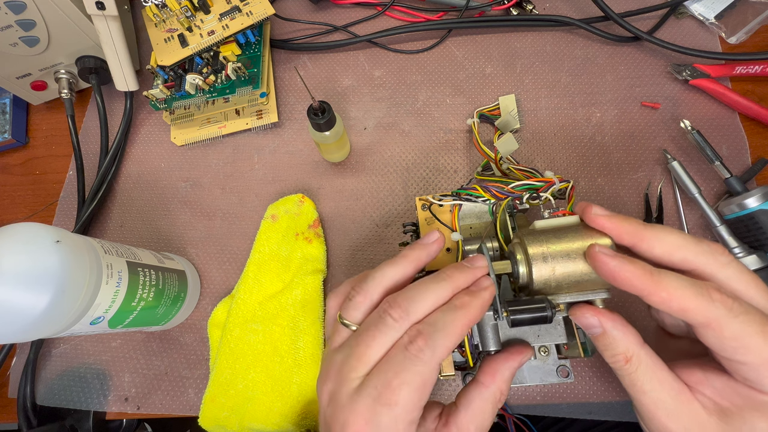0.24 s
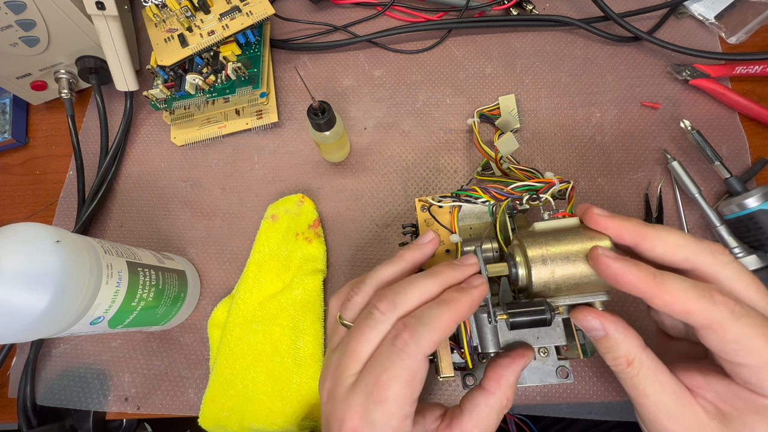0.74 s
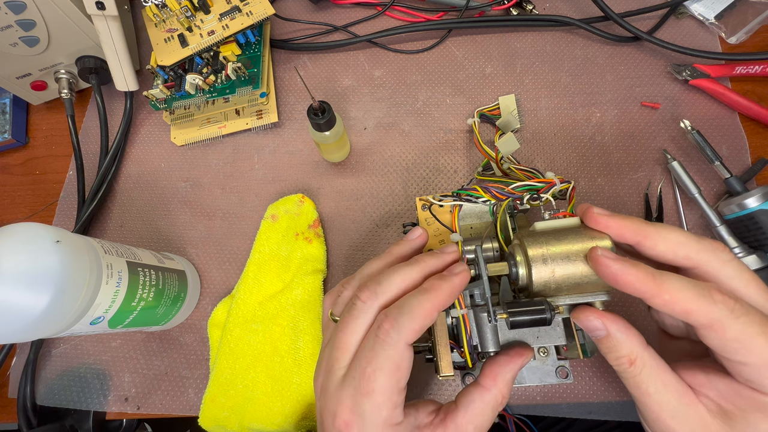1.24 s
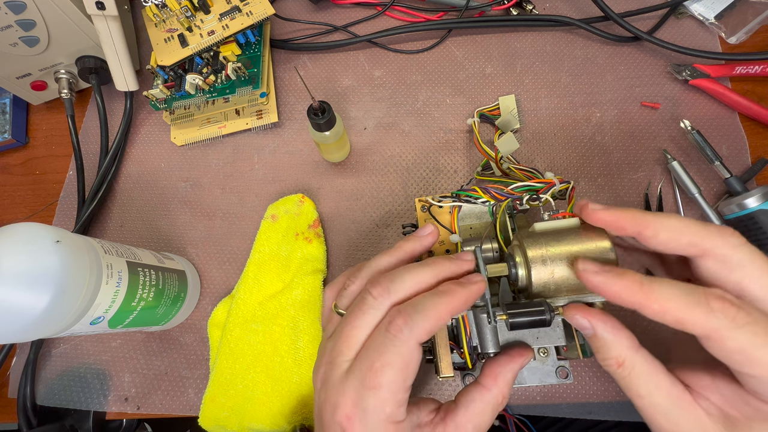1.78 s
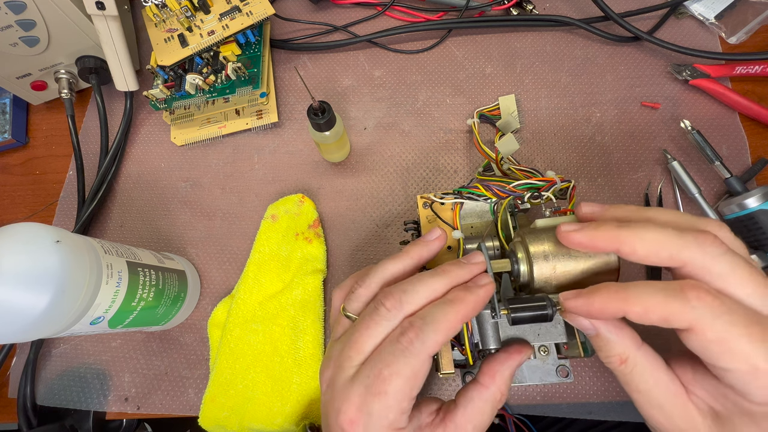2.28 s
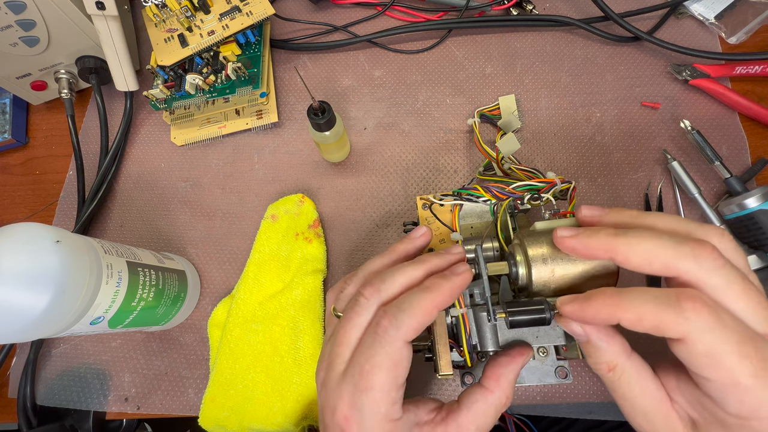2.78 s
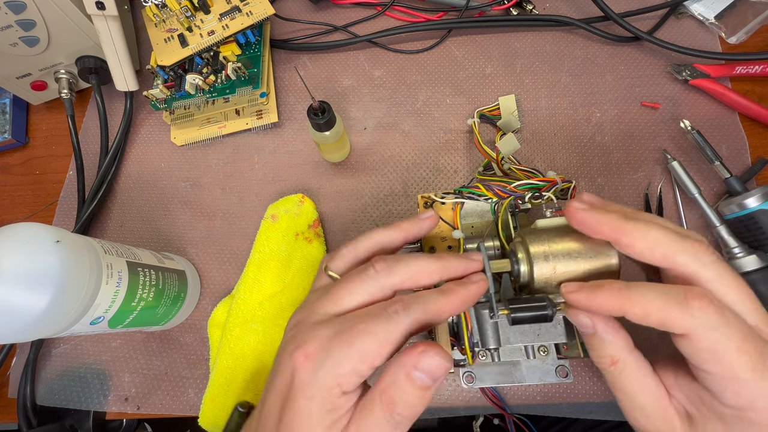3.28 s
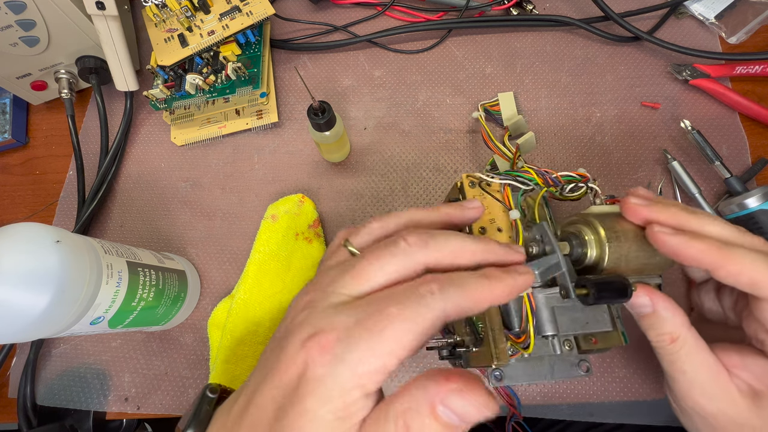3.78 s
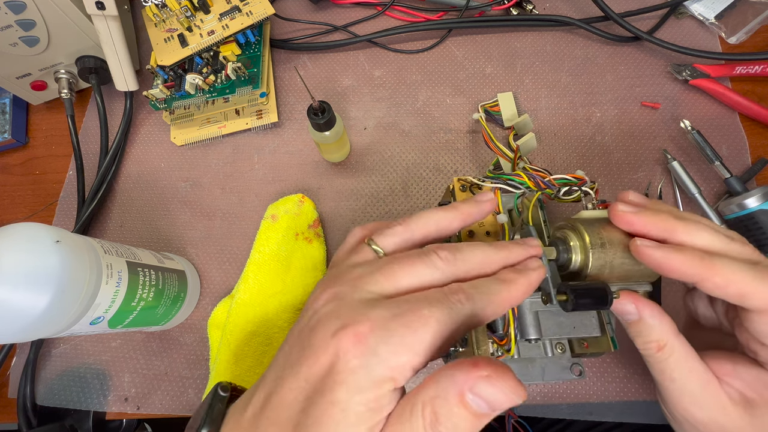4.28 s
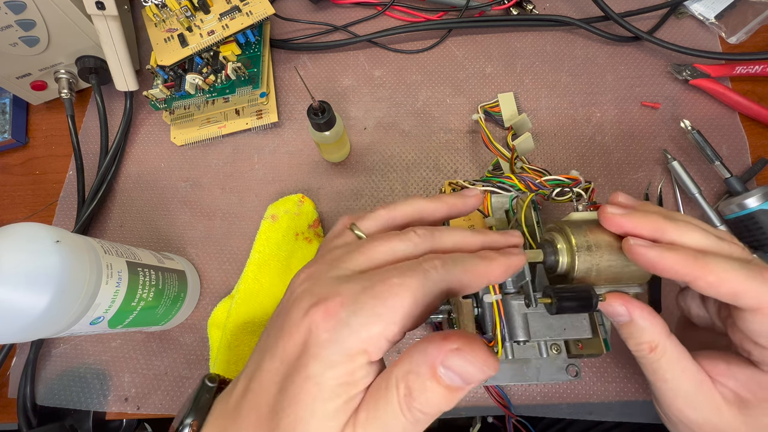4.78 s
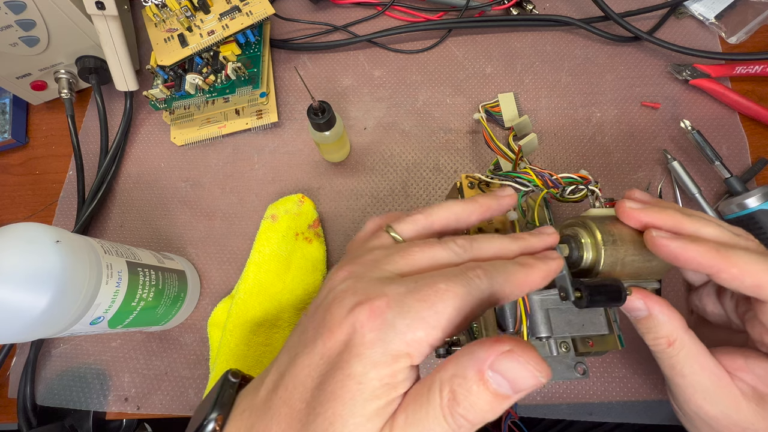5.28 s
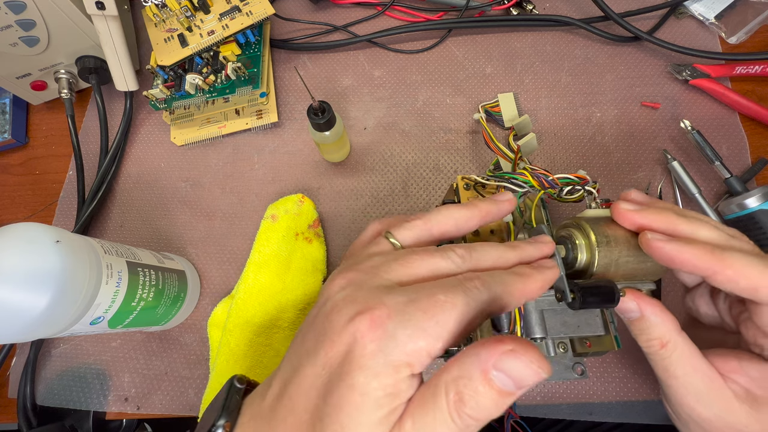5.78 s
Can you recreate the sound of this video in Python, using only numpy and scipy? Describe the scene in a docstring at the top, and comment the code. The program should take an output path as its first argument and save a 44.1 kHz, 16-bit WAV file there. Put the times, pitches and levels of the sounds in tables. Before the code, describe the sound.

Close, dry metallic clacks from a hand-worked solenoid, each led by a light tick and followed by a softer snap, over quiet equipment hum.

```python
"""A solenoid plunger is pushed in by hand and let back, clacking on its stop, heard close up in stereo.
Each clack is a burst of noise plus the ringing notes of the steel; the sleeve adds plinks and a grating slide.
The levers, spring and chassis tick in the same way, with softer noise and notes of their own.
Each action also thumps the workbench, made from low fading sines and a soft scuff.
Steady tones and coloured noise make the faint equipment hum and hiss; a short tail makes the small room."""
import sys
import numpy as np
from scipy import signal
from scipy.fft import rfft, irfft, next_fast_len
from scipy.io import wavfile
from scipy.ndimage import map_coordinates

SR = 44100
rng = np.random.default_rng(int(sys.argv[2]) if len(sys.argv) > 2 else 0)


def to_wav(sig):
    """Store sig (one row per channel, or 1-D mono) as 16-bit WAV at the path in sys.argv[1].

    Samples outside -1..1 are clipped; the rate is SR.
    """
    pcm = np.clip(np.atleast_2d(sig), -1, 1) * 32767
    pcm = np.round(pcm).astype(np.int16)
    wavfile.write(sys.argv[1], SR, pcm.T)  # frames by channels


N = 266364  # length in samples, about 6 s


def amp(db):
    """Turn decibels into a gain."""
    return 10 ** (np.asarray(db) / 20)


def unit(x):
    """Scale to an rms level of 1."""
    return x / np.sqrt(np.mean(x ** 2) + 1e-20)


def along(points, hz):
    """Read a curve given as (pitch_hz, value) points, with pitch on a log axis."""
    point_hz, value = np.transpose(points)
    return np.interp(np.log(hz + 1), np.log(point_hz + 1), value)


def wobble(rate):
    """A smooth random curve through `rate` random points a second."""
    points = rng.standard_normal(int(N * rate / SR) + 4)
    return map_coordinates(points, [np.arange(N) * rate / SR])


def coloured(x, gain_db):
    """Filter by a gain in dB at each frequency, with no sound ahead of the hit (minimum phase)."""
    n = x.shape[-1]
    m = 2 * next_fast_len(n // 2 + 2048)
    gain = amp(gain_db(np.fft.rfftfreq(m, 1 / SR)))
    cepstrum = irfft(np.log(gain + 1e-6), m)
    # folding the cepstrum onto positive times makes the filter minimum phase
    cepstrum[1:m // 2] *= 2
    cepstrum[m // 2 + 1:] = 0
    return irfft(rfft(x, m) * np.exp(rfft(cepstrum)), m)[..., :n]


def leaning(pair, side):
    """Tilt each frequency left or right; side is (pitch_hz, left_minus_right_db)."""
    n = pair.shape[1]
    m = next_fast_len(n + 2048)
    lean_db = along(side, np.fft.rfftfreq(m, 1 / SR)) / 2
    return irfft(rfft(pair, m) * amp([lean_db, -lean_db]), m)[:, :n]


def fade(t, t60):
    """Exponential decay that falls 60 dB in t60 seconds."""
    return np.exp(-np.log(1000) * t / t60)


def add(track, s, sound):
    """Mix a sound into the track at s seconds."""
    start = max(round(s * SR), 0)
    part = track[:, start:start + sound.shape[1]]
    part += sound[:, :part.shape[1]]


# How alike steady noise is on the left and right: pitch_hz, likeness (1 same, 0 unrelated, -1 opposite)
LIKENESS = [(60, 1), (130, -0.51), (290, 0.086), (640, -1.03), (1400, 0.094), (3100, -0.25), (7000, 0.39),
            (14000, 1)]


def rush(spectrum):
    """Steady stereo noise of rms 1, coloured by (pitch_hz, level_db) and shared by mid and side."""
    hz = np.fft.rfftfreq(N, 1 / SR)
    turn = np.arccos(np.clip(along(LIKENESS, hz), -1, 1)) / 2
    noise = rfft(rng.standard_normal((2, N))) * amp(along(spectrum, hz))
    mid, side = irfft(noise * [np.cos(turn), np.sin(turn)], N)
    return unit(np.array([mid + side, mid - side]))


HELD_T60 = 0.075  # s, longest ring the fingers allow


def contact(modes, colour, crack_t60, rattle_db, rattle_t60, ring_db, rough, rise):
    """Steel on steel: a crack, a darker rattle of loose parts, and the part's own ringing modes."""
    t = np.arange(SR // 4) / SR
    hz, db, t60 = np.transpose(modes)[:, :, None]
    t60 = np.minimum(t60, HELD_T60)
    # each microphone hears the modes in its own random phase
    phase = rng.uniform(0, 2 * np.pi, (2, len(modes)))
    strength = amp(rng.standard_normal(len(modes))) * np.exp(1j * phase)
    # parts that still touch make every mode wander in pitch
    steps = rng.standard_normal((len(modes), len(t)))
    wander = rough * np.sqrt(hz / SR) * np.cumsum(steps, axis=1)
    tones = amp(db) * fade(t, t60) * np.exp(1j * (2 * np.pi * hz * t + wander))
    ring = (strength @ tones).real

    rattle = coloured(rng.standard_normal((2, len(t))), lambda f: along([(6000, 2.5), (13000, -15.0)], f))
    burst = rng.standard_normal((2, len(t))) * fade(t, crack_t60)
    chatter = burst + amp(rattle_db) * rattle * fade(t, rattle_t60)
    crack = coloured(chatter, lambda f: along(colour, f))
    sound = (unit(crack) + amp(ring_db) * unit(ring)) * (1 - np.exp(-t / rise))
    return sound / np.sqrt(np.mean(sound[:, :SR // 200] ** 2))  # the first 5 ms get rms 1


# Landings on the stop: start_s, level_db, body_db, clank_db (near 3 kHz), left_minus_right_db (of the ring)
LANDINGS = [(0.188, -28, 0, -3, 15), (0.8364, -27, 0.5, -3.5, 18), (1.5433, -28.5, 1.5, -3.5, 13.5),
            (2.3485, -32.5, 0, 1, 5.5), (3.42, -30, -0.5, -1.5, 4), (4.364, -26.5, -2.5, -3, 2.5),
            (5.7748, -24.5, -4, -6, 4)]
# Hollow plinks of the plunger in its sleeve: start_s, level_db
SLEEVE_PLINKS = [(0.396, -49), (0.994, -52.5), (1.4416, -53.5), (3.5479, -50), (5.236, -55), (5.764, -31.5),
                 (5.9111, -49)]
# Notes of the solenoid frame and plunger: pitch_hz, level_db, fade_s (60 dB, before the fingers' limit)
STEEL_NOTES = [(394, -3.5, 0.22), (521.6, 4, 0.11), (599, 10, 0.093), (755, 11.5, 0.038), (1173, 10, 0.09),
               (1373, 7, 0.061), (1610, 12.5, 0.035), (1763, 12.5, 0.038), (2162, 7.5, 0.026),
               (3310, 2, 0.048), (3485, 0, 0.0614), (4200, -1.5, .06), (4470, -7.5, 0.096),
               (4878, 7.5, 0.034), (5133, 5.5, 0.032), (5500, -12.5, 0.021), (6620, 0, 0.038)]
# Notes of the sleeve: pitch_hz, level_db, fade_s (60 dB, before the fingers' limit)
SLEEVE_NOTES = [(1660, 2.5, 0.079), (1685, -7, 0.036), (1920, -42, 0.041)]
# Noise colour of a hard contact: pitch_hz, level_db
HARD_COLOUR = [(150, -16), (350, -2), (600, 5), (930, -1.5), (1600, 2), (2600, -4), (3300, -5.5),
               (4400, -7.5), (4900, -9), (6600, -6.5), (7600, -18), (9300, -18), (13000, -23),
               (16000, -39.5)]
# Colour shared by all landings, below the ring: pitch_hz, gain_db
LANDING_LOW_COLOUR = [(750, -6.5), (1100, -7.5), (2200, -2.5), (2800, 3), (3900, 3.5), (4500, 1)]
# Colour shared by all landings, from the ring up: pitch_hz, gain_db
LANDING_HIGH_COLOUR = [(7000, 0), (9000, 6.5)]


def plunger():
    """The plunger plinks in its sleeve and lands hard on its stop; the grip sets body and clank."""
    out = np.zeros((2, N))
    for s, db, body_db, clank_db, pan_db in LANDINGS:
        landing = contact(STEEL_NOTES, HARD_COLOUR, crack_t60=0.043, rattle_db=-5.5, rattle_t60=0.075,
                          ring_db=3, rough=0.28, rise=0.0008)
        grip = [(2200, body_db), (2800, clank_db), (3900, clank_db), (4500, 0.0098)]

        def tint(hz):
            return along(LANDING_LOW_COLOUR, hz) + along(LANDING_HIGH_COLOUR, hz) + along(grip, hz)

        side = [(400, -2.0), (2400, -3.0), (3400, 1.0), (4900, pan_db), (6500, 6.5), (15000, -4.0)]
        add(out, s, amp(db - 1.5) * leaning(coloured(landing, tint), side))
    for s, db in SLEEVE_PLINKS:
        plink = contact(SLEEVE_NOTES, HARD_COLOUR, crack_t60=0.0037, rattle_db=-15, rattle_t60=0.14,
                        ring_db=7, rough=0.64, rise=0.0003)
        add(out, s, amp(db - 5.5) * plink)
    return out


def sliding():
    """The plunger grates in its sleeve, louder as it gathers speed towards the stop."""
    t = np.arange(N) / SR
    speed = sum(np.exp(-np.abs(s - t) / 0.053) * (t < s) for s, *_ in LANDINGS)
    grit = rush([(500, 2), (1000, 15), (1650, 5.0), (2500, 2.0), (3400, -15.0), (4300, 1.0),
                 (9000, -10), (15000, -69)])
    return amp(-63.0 + 3.9 * wobble(150)) * speed * grit


def rebounding(events, after_s, loss_db):
    """Each contact and its softer rebound, as (start_s, level_db)."""
    hits = []
    for s, db, *_ in events:
        hits += [(s, db), (s + after_s, db + loss_db)]
    return hits


def strikes(events, make, level_db, body_db, edge_db):
    """A fresh contact for each (start_s, level_db) event, all with the same body and edge."""
    out = np.zeros((2, N))
    tint = [(2000, body_db), (2800, 0), (7000, 0), (9000, edge_db)]
    for s, db in events:
        add(out, s, amp(db + level_db) * coloured(make(), lambda hz: along(tint, hz)))
    return out


# A finger presses the lever and twangs its spring: start_s, level_db, bench_shove_db
LEVER_PRESSES = [(0.131, -43.5, -36), (0.7841, -48, -37), (1.491, -48.5, -39.5), (3.3522, -53, -42),
                 (4.321, -48, -34.5), (5.7327, -49, -37)]
# The finger lets go and the lever snaps back: start_s, level_db
LEVER_RELEASES = [(0.4073, -47), (1.0072, -49.5), (1.717, -48.5), (3.5709, -52), (4.5029, -48.5),
                  (5.2674, -49), (5.965, -50)]
# The levers knock in their pivots: start_s, level_db
PIVOT_KNOCKS = [(0.6267, -75), (1.779, -65.5), (1.867, -69.5), (2.2544, -70), (2.5572, -60.5),
                (2.5843, -62), (3.7567, -63.5), (4.1895, -63.5), (4.2747, -54.5), (4.9205, -56.5),
                (4.9447, -48.5), (4.9703, -54), (5.034, -52), (5.669, -58.5)]
# The chassis rocks back onto the bench: start_s, knock_db, thump_db
CHASSIS_SETTLES = [(0.42, -58, -34), (1.741, -61, -39), (2.532, -50.5, -35.5), (3.232, -71.5, -48.5),
                   (3.6769, -50.5, -28), (4.5711, -51.5, -28), (4.985, -62, -34.5), (5.349, -60.5, -30)]
# Notes of the return spring: pitch_hz, level_db, fade_s (60 dB, before the fingers' limit)
SPRING_NOTES = [(699.6, -4, 0.12), (1620, 1, 0.034), (3243, 0, 0.041), (3368, 3, 0.054), (3480, -7, 0.05)]
# Notes of the lever: pitch_hz, level_db, fade_s (60 dB, before the fingers' limit)
LEVER_NOTES = [(1807, 3.5, 0.044), (2200, -20, 0.039), (6020, 7, 0.074), (6866, 16, 0.032),
               (6400, -4, 0.032), (8400, -5.5, 0.12), (8800, 7.5, 0.042)]
# Noise colour of a light contact: pitch_hz, level_db
LIGHT_COLOUR = [(300, -6), (700, -1.5), (1000, -0.5), (1700, 7.5), (2600, 3), (3400, 4), (4200, -1),
                (6500, -5.5), (8000, -7), (9600, 2.5), (11000, -20), (12800, 3), (16000, -17.5)]
# Noise colour of the chassis landing softly, with little treble: pitch_hz, level_db
SOFT_COLOUR = [(300, 0), (700, -3.5), (1000, -1), (1750, 7.5), (2600, 1.5), (3400, -0.5), (4500, -5.5),
               (7000, -13.5), (16000, -27)]
RELEASE_REBOUND_S = 0.022  # the lever's second contact


def linkage():
    """Pressing the lever twangs its spring; letting go snaps it back; pivots and chassis knock."""
    def twang():
        return contact(SPRING_NOTES, LIGHT_COLOUR, crack_t60=0.017, rattle_db=-15, rattle_t60=0.2,
                       ring_db=4.5, rough=0.35, rise=0.0022)

    def snap():
        return contact(LEVER_NOTES, LIGHT_COLOUR, crack_t60=0.031, rattle_db=-12.5, rattle_t60=0.14,
                       ring_db=1.5, rough=0.62, rise=0.0029)

    def knock():
        return contact(STEEL_NOTES, LIGHT_COLOUR, crack_t60=0.018, rattle_db=-9, rattle_t60=0.098,
                       ring_db=-7.0, rough=0.38, rise=0.0015)

    def settle():
        return contact(SPRING_NOTES, SOFT_COLOUR, crack_t60=0.016, rattle_db=-11.5, rattle_t60=0.081,
                       ring_db=-9, rough=0.37, rise=0.002)

    presses = rebounding(LEVER_PRESSES, after_s=0.021, loss_db=-4)
    releases = rebounding(LEVER_RELEASES, after_s=RELEASE_REBOUND_S, loss_db=-4.5)
    landings = [(s, knock_db) for s, knock_db, _ in CHASSIS_SETTLES]
    twangs = strikes(presses, twang, level_db=-6, body_db=4.0, edge_db=7)
    snaps = strikes(releases, snap, level_db=-2.5, body_db=3.5, edge_db=-0.5)
    knocks = strikes(PIVOT_KNOCKS, knock, level_db=-3.0, body_db=5.5, edge_db=-5.5)
    settles = strikes(landings, settle, level_db=-0.5, body_db=2.5, edge_db=2.5)
    return leaning(twangs + snaps + knocks + settles, [(1500, -3.5), (5000, 4), (12000, .5)])


PRESS_SHOVE_S, SETTLE_SHOVE_S = 0.01003, 0.00614  # the chassis gives a moment after the contact


def shoves():
    """Every action also shoves the chassis against the bench: (start_s, level_db, hardness_db)."""
    presses = [(s + PRESS_SHOVE_S, db, -13) for s, _, db in LEVER_PRESSES]
    landings = [(s, db - 6.5, -6) for s, db, *_ in LANDINGS]
    releases = [(s + RELEASE_REBOUND_S, db + 8.5, -14.5) for s, db in LEVER_RELEASES]
    settles = [(s + SETTLE_SHOVE_S, db, -24) for s, _, db in CHASSIS_SETTLES]
    knocks = [(s + SETTLE_SHOVE_S, db + 9.5, -10.5) for s, db in PIVOT_KNOCKS]
    return presses + landings + releases + settles + knocks


# Notes of the bench top and chassis: pitch_hz, level_db, fade_s (60 dB)
BENCH_NOTES = [(75.2, -2, 0.4), (108.7, 3.5, 0.26), (117.2, 4.5, 0.065), (165.7, -6.5, 0.32),
               (179.2, -5, 0.32), (221.8, -13.5, 0.17), (264.8, -7, 0.15), (306.6, -10.5, 0.12),
               (317, -9.5, 0.096)]
# How far apart in phase the two microphones hear the bench: pitch_hz, phase_radians
BENCH_PHASE = [(70, .1), (115, .5), (180, 1.1), (280, 1.2)]
# How the bench leans between the microphones: pitch_hz, left_minus_right_db
BENCH_LEAN = [(70, -2), (110, -2.5), (190, -7), (300, -3)]


def bench():
    """The chassis rocks the bench top; a harder shove reaches its higher modes."""
    out = np.zeros((2, N))
    t = np.arange(SR // 2) / SR
    hz, mode_db, t60 = np.transpose(BENCH_NOTES)[:, :, None]
    # neighbouring modes move against each other, so the thump swells
    sign = (-1) ** np.arange(len(BENCH_NOTES))[:, None]
    lag = along(BENCH_PHASE, hz)
    scuff_colour = [(80, -22.5), (150, -1.5), (330, -6.5), (480, -15.5), (700, -18.5), (1500, -45)]
    for s, db, hard_db in shoves():
        reach_db = along([(90, 0.044), (260, 0.77)], hz) * (hard_db + 14.5)
        strength = sign * amp(mode_db + reach_db + rng.standard_normal(hz.shape))
        modes = strength * fade(t, t60) * (1 - np.exp(-t / 0.00093))
        thump = np.array([np.sum(modes * np.sin(2 * np.pi * hz * t + turn), axis=0)
                          for turn in (-lag / 2, lag / 2)])
        noise = rng.standard_normal((2, len(t))) * fade(t, 0.14)
        scuff = coloured(noise, lambda f: along(scuff_colour, f))
        add(out, s, amp(db + 1.5) * thump / np.abs(thump).max()
            + amp(db + hard_db + 4.5) * scuff / np.abs(scuff).max())
    # the bench sound dips around 50 Hz, below its first mode, and rises again in the deepest bass
    radiated = coloured(out, lambda f: along([(25, 5.5), (50, -15.5), (65, 0.0)], f))
    return leaning(radiated, BENCH_LEAN)


# Room echo: pitch_hz, fade_s (60 dB)
ROOM_FADE = [(200, 0.51), (1500, 0.44), (4800, 0.29), (8000, 0.37), (14000, 0.13)]


def room(x):
    """A short diffuse tail of fading noise, different at each microphone."""
    hz, t, grains = signal.stft(rng.standard_normal((2, SR // 2)), SR, nperseg=256)
    shape = fade(t, along(ROOM_FADE, hz)[:, None]) * (1 - np.exp(-t / 0.0009))
    tail = signal.istft(grains * shape, SR, nperseg=256)[1]
    return signal.fftconvolve(x, tail / np.linalg.norm(tail[0]), axes=1)[:, :N]


# Wavering hum tones: pitch_hz, level_db (before the waver and the left-right balance)
HUM_TONES = [(52.5, -59.5), (132, -68), (200.5, -72), (240, -84.5), (300.5, -84.5), (360, -90), (480, -89),
             (600, -92.5), (661, -92), (700, -89), (840, -89)]
# Hum at twice the mains frequency, rising and falling: start_s, level_db (before a small trim and waver)
MAINS_BUZZ = [(0.0, -71), (0.3, -64), (1.95, -51.5), (3.25, -61), (3.52, -56), (4.09, -76), (4.56, -57),
              (4.78, -63), (6.04, -64.5)]
# Colour of the low drone noise: pitch_hz, level_db
DRONE_COLOUR = [(20, -29), (38, -16.5), (52, -1), (65, -5), (100, -6.5), (130, -8.5), (155, -15.5),
                (190, -5.5), (260, -23), (400, -28), (700, -22.5), (900, -31.5), (1500, -78)]
# Colour of the fan noise: pitch_hz, level_db
FAN_COLOUR = [(200, -14), (450, -5), (740, -4), (900, -9), (1150, -7), (1550, -8), (1950, 0), (2250, -7),
              (2700, -20), (5000, -40), (16000, -70)]
# Colour of the thin hiss: pitch_hz, level_db
HISS_COLOUR = [(1000, -7), (2700, -16), (5500, -22.5), (6600, -16.5), (7330, -0.5), (8000, -19),
               (9800, -23.5), (11000, -37), (12600, -13), (16000, -48)]
# How fan and hiss lean: pitch_hz, left_minus_right_db
HISS_LEAN = [(500, 7.5), (1300, 11.5), (2200, 7), (4400, 6.5), (7500, 20), (10000, -2.5), (13000, 0.5)]


def equipment():
    """Bench gear: wavering mains hum over a low noise drone, fan noise, and a thin band of hiss."""
    t = np.arange(N) / SR

    def tone(hz):
        phase = 2 * np.pi * hz * t + .2 * wobble(3)
        return np.sqrt(2) * np.sin(phase) * amp(3 * wobble(2))

    buzz_db = np.interp(t, *np.transpose(MAINS_BUZZ)) - .5
    hum = sum(amp(db) * tone(hz) for hz, db in HUM_TONES) + amp(buzz_db) * tone(100.3)
    rumble = amp(-63.0 + 1.8 * wobble(5)) * rush(DRONE_COLOUR)
    drone = (hum + rumble) * amp([[-.8], [.8]])  # a little louder on the right
    fan = amp(-74 + 2.5 * wobble(4.08)) * rush(FAN_COLOUR)
    hiss = amp(-77.0) * rush(HISS_COLOUR)
    return drone + leaning(fan + hiss, HISS_LEAN)


def scene():
    """The mechanism and the bench in the room, over the equipment's hum and hiss."""
    clacks = plunger()
    ticks = linkage() + sliding()
    thumps = bench()
    echo = room(amp(-17.5) * clacks + amp(-13.5) * ticks + amp(-14.5) * thumps)
    return clacks + ticks + thumps + echo + equipment()


TOP_HZ = 16300  # upper band limit


def record(dry):
    """The microphone sheds the deepest bass and keeps nothing above its band limit."""
    m = next_fast_len(N + SR // 2)
    lean = signal.sosfilt(signal.butter(4, 38, "highpass", fs=SR, output="sos"), dry)
    return irfft(rfft(lean, m) * (np.fft.rfftfreq(m, 1 / SR) < TOP_HZ), m)[:, :N]


dry = scene()
out = record(dry)
to_wav(out)
```